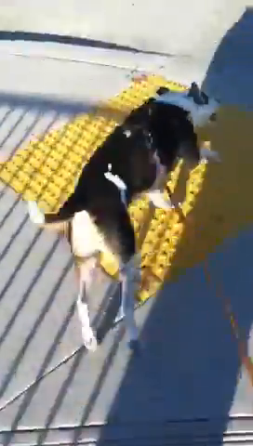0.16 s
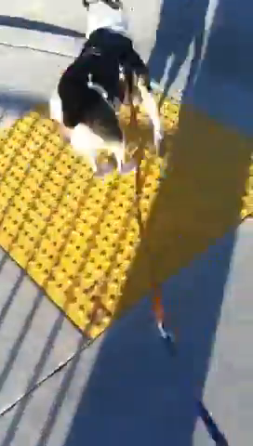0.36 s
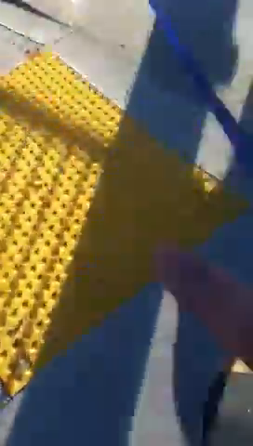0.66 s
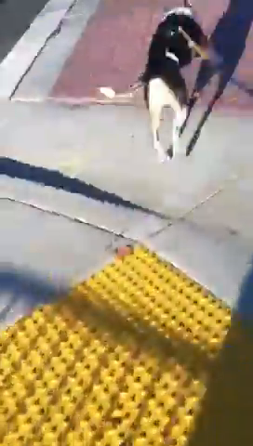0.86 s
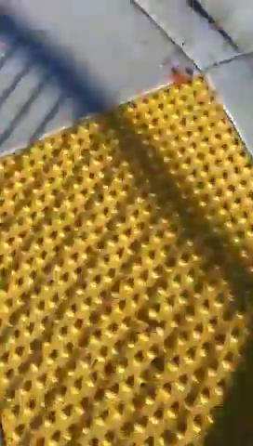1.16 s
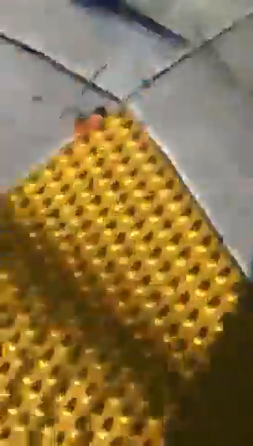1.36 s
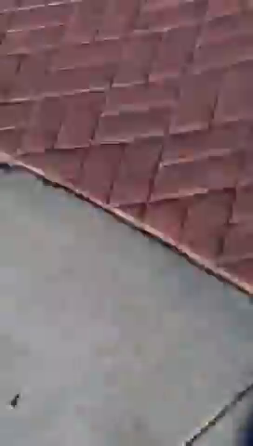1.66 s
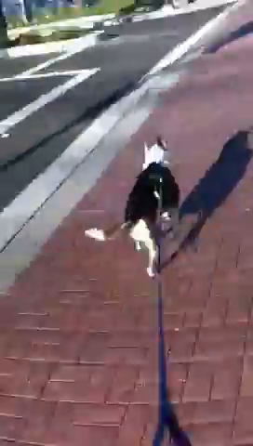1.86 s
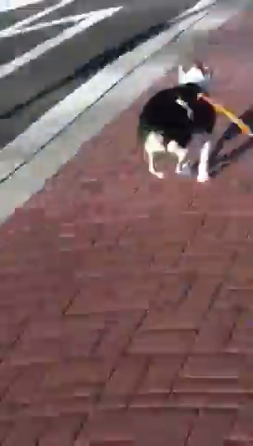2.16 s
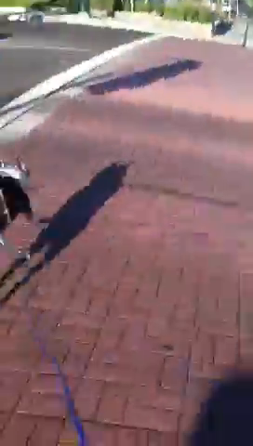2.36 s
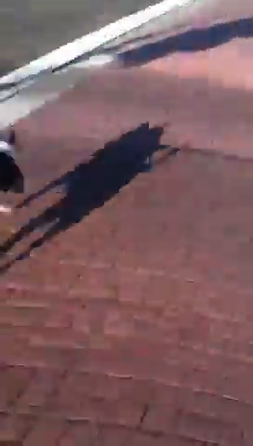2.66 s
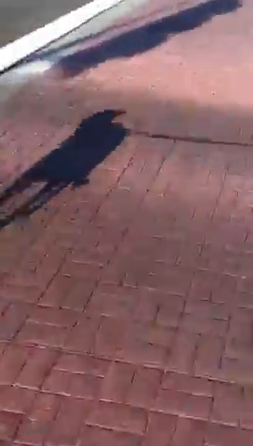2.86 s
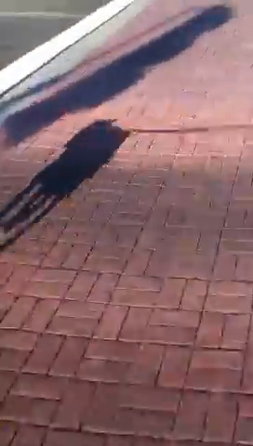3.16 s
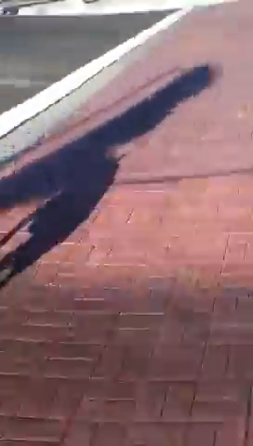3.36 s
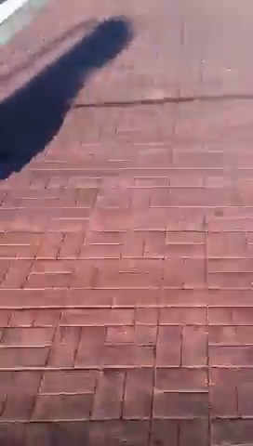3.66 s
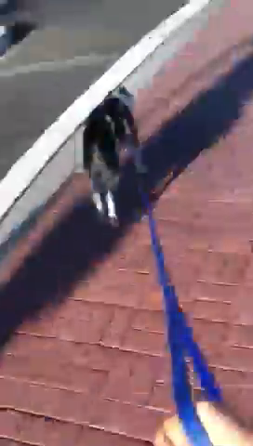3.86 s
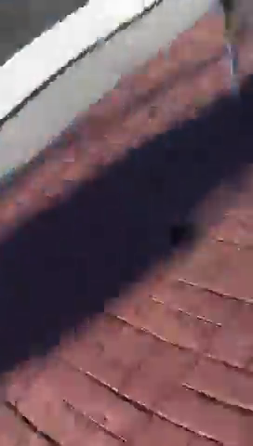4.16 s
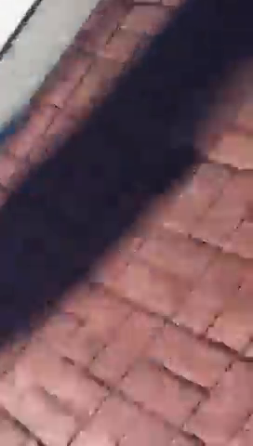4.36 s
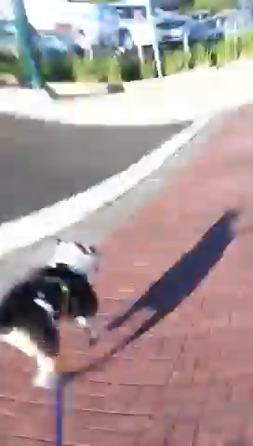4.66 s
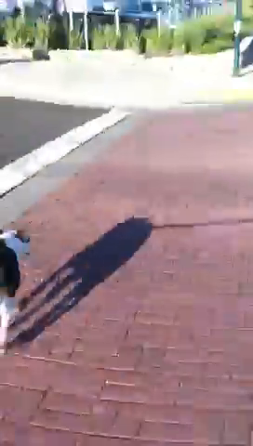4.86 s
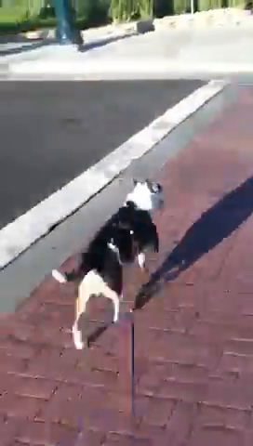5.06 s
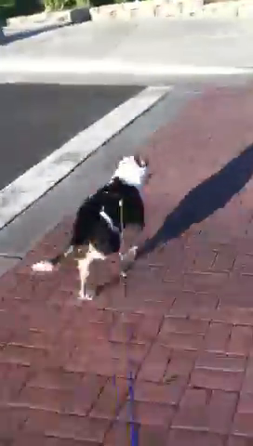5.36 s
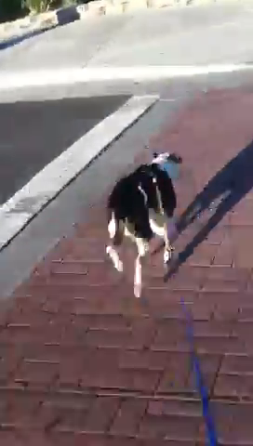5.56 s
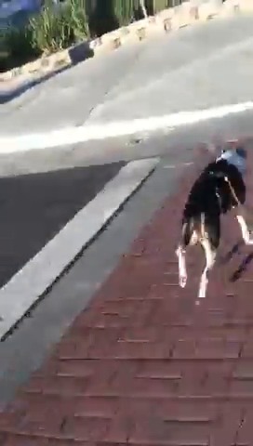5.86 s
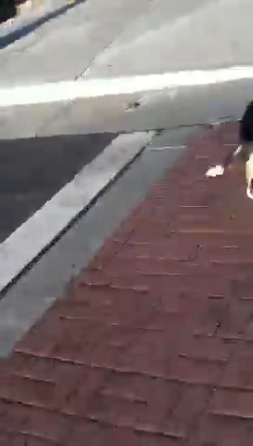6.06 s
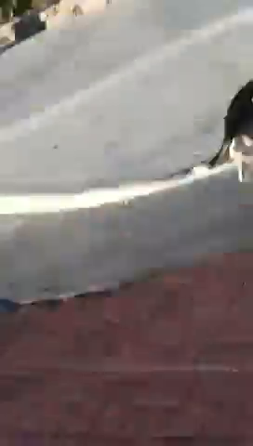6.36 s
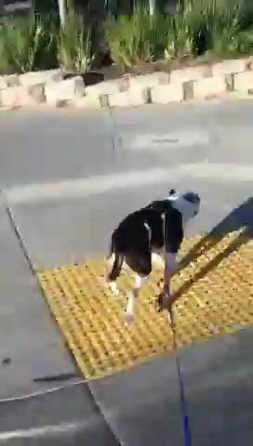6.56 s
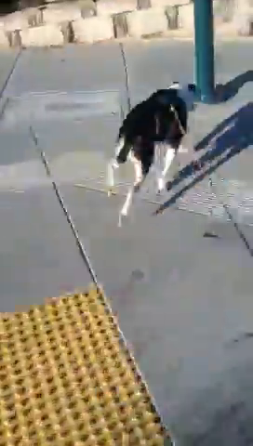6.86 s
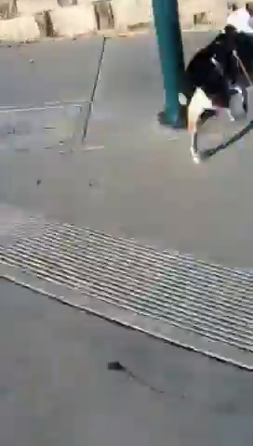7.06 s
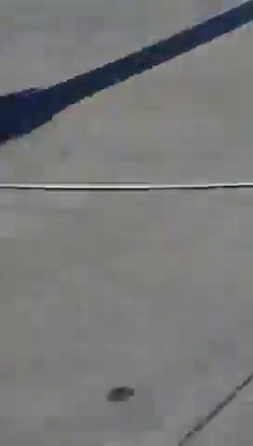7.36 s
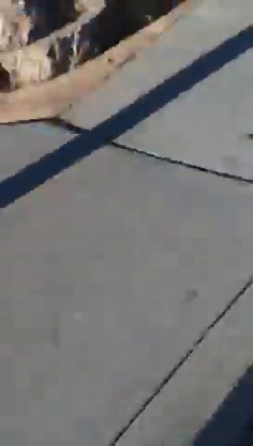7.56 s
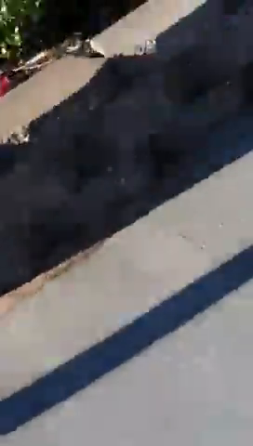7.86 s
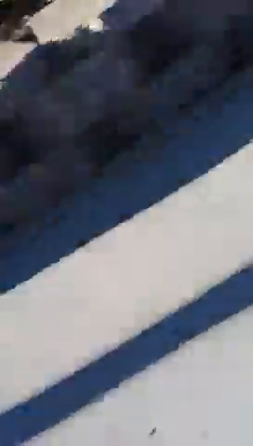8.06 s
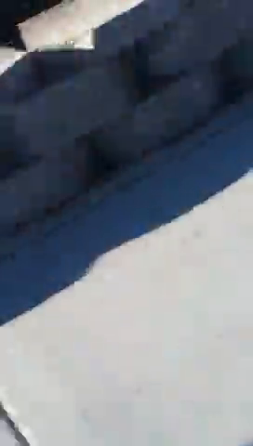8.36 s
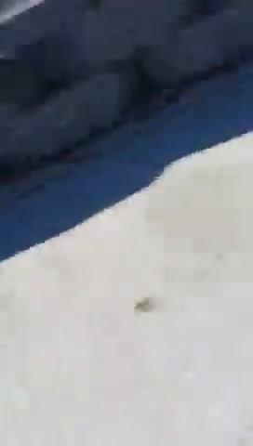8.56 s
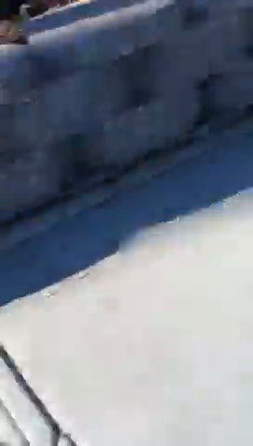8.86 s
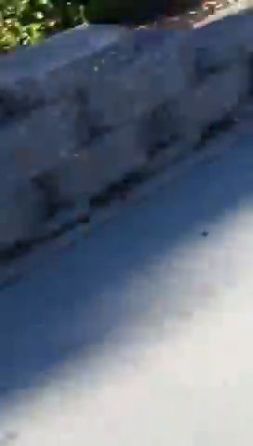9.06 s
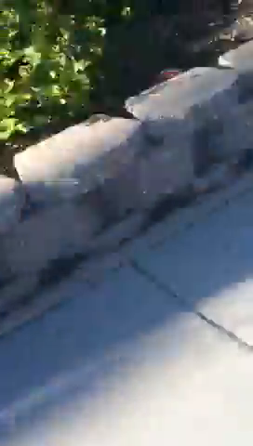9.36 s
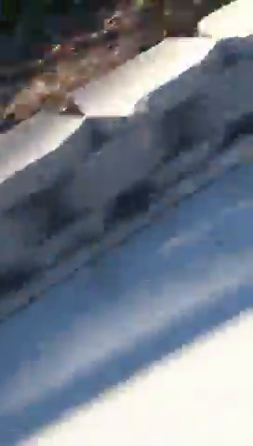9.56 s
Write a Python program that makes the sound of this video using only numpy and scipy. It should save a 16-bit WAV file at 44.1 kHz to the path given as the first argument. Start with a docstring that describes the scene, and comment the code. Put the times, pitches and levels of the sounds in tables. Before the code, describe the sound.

Close, dry outdoor sound over very faint traffic. A soft tap comes at 0.1 s, then small bright leash-clip clinks and scrapes from 0.2 to 0.45 s. At 0.5 s a tiny squeak and a hoarse, falling wheel chirp mark the push-off. A skateboard then scrapes over a studded, hollow-sounding ramp, with knocks and a hard crack at 1.2 s, and more sharp clacks at 1.75 and 1.9 s. From about 2.2 s brick paving makes a loud, surging wooden drone and rasp, crowded with thumps, knocks and rattling parts; a quick even chatter occurs at 4.1 s, and the roar is coarser from 4.7 to 6.7 s. Around 7.2 s it falls to a quiet low rumble with sandy hiss on concrete. Joint clacks in front-then-rear pairs come at 7.4, 7.7, 7.85, 8.45, 8.9, 9.0 and 9.6 s, with a heavy thud at 8.5 s and a crackling loose-cover rattle near 8.9 s.

```python
"""A street with studded kerb ramps, brick paving and smooth concrete: a skateboard rolls behind a leashed dog.
The leash clip clinks as ringing metal modes and the push-off squeaks; then filtered, bump-driven noise
makes the deck drone, rumble, rasp and hiss. Bumps thump the wooden deck and knock the wheels; joints clack.
Small parts clatter, grit ticks as short noise puffs, and shaped noise is the distant traffic.
The close microphone limits the peaks."""
import sys
import numpy as np
from scipy import signal
from scipy.io import wavfile
from scipy.ndimage import uniform_filter1d, minimum_filter1d, map_coordinates

SR = 44100
rng = np.random.default_rng(int(sys.argv[2]) if len(sys.argv) > 2 else 0)


def wav_record(signal):
    """Record a signal, one row per channel, as 16-bit PCM in the file named by sys.argv[1]."""
    frames = np.transpose(np.atleast_2d(signal))
    bounded = np.clip(frames, -1, 1)
    # unit amplitude maps onto the largest positive 16-bit level
    quanta = np.round(bounded * 32767).astype(np.int16)
    wavfile.write(sys.argv[1], SR, quanta)


N = 428652
TIME = np.arange(N) / SR

# wheel rasp spectrum: (nominal frequency [Hz], level [dB])
RASP_SPECTRUM = [(560, -18.5), (800, 5.5), (1100, 5), (1300, -5.5), (1550, -2), (1850, -25), (2200, -21),
                 (2650, -19), (3150, -21.5), (4000, -35.5), (8000, -40.5)]
# grit hiss and metal scrape spectrum: (frequency [Hz], level [dB])
GRIT_SPECTRUM = [(2000, -1), (4000, -0.5), (6000, 2), (9500, -2), (11500, -10), (13500, -22.5),
                 (15500, -40.5)]
# hard-edge contact spectrum: (nominal frequency [Hz], level [dB])
CRACK_SPECTRUM = [(500, 3.5), (1300, 4.5), (2050, 6.5), (2500, -0.5), (3300, -0.5), (4500, -12),
                  (6500, -30), (12000, -47)]
# stretches of ground: (start [s], deck drone before surges [dB],
# then relative to the drone: rumble [dB], rasp [dB], grit hiss [dB])
GROUND_STRETCHES = [(0.473, -31, -7.5, 3, -25.5), (0.55, -24.5, -16.5, -1.5, -33),
                    (0.66, -25.5, -28, -3, -34), (0.879, -33.5, -28, -4, -31), (1.11, -29, -23, 0, -23.5),
                    (1.42, -30.5, -12, -2, -27), (1.971, -33.5, -18, -7.5, -54),
                    (2.06, -30.5, -19.5, -10, -40), (2.26, -20, -17.5, -9.5, -37),
                    (2.55, -21, -14, -5, -47.5), (3.7, -20, -11, -12.5, -40.5), (4.68, -21, -12, -4.5, -50),
                    (6.3, -20.5, -6.5, -6.5, -37.5), (6.67, -19.5, -1, -9, -41),
                    (7.08, -22.5, -3, -10, -43), (7.247, -31.5, -5, -13, -31), (8.08, -33.5, -2, -8, -30.5),
                    (8.54, -31.5, -2, -4, -30), (8.87, -25, -6.5, 2, -42), (9.0, -37, 0, -2, -23),
                    (9.18, -30, -5.5, -7, -28.5)]
# slab joints crossed at a slant: (time [s], front thump [dB], front knock [dB], front ring [Hz],
# second wheel's delay [s], its relative level [dB], rear axle's delay [s], rear thump [dB],
# rear knock [dB], nominal deck pitch [Hz])
JOINTS = [(7.3687, -13.5, -30.5, 1340, 0.0066, 0.5, 0.073, -10, -25, 532),
          (7.656, -17.5, -25, 1670, .007, -6, 0.077, -10, -22.5, 543),
          (7.842, -17, -24.5, 1010, 0.014, -11, 0.077, -12.5, -25, 515),
          (8.45, -15, -29, 1300, 0.013, -0.5, 0.075, -17, -23.5, 512),
          (8.87, -15.5, -19.5, 920, .013, -3.5, .0752, -11, -14.5, 493),
          (8.987, -12, -29, 1650, 0.0043, -6, 0.078, -18, -17.5, 535),
          (9.587, -11, -24.5, 1120, .011, -7, 0.075, -8.5, -18, 553)]


def amp(db):
    """Decibels to gain."""
    return 10 ** (np.asarray(db) / 20)


def evened(x):
    """Scales to unit power."""
    return x / np.sqrt(np.mean(x ** 2) + 1e-20)


def add(mix, s, sound):
    """Mixes a sound in at time s."""
    part = mix[max(round(s * SR), 0):][:len(sound)]
    part += sound[:len(part)]


def smooth(x, size):
    """Triangular running mean."""
    return uniform_filter1d(uniform_filter1d(x, size), size)


def steadied(x, size=3000):
    """Unit power over each short stretch; faster bumps stay."""
    return x / np.sqrt(abs(smooth(x ** 2, size=size)) + 1e-12)


def ring(x, spectrum, size=4096):
    """Passes x through a causal, minimum-phase body that has this spectrum."""
    hz, db = np.transpose(spectrum)
    log_f = np.log(abs(np.fft.fftfreq(size, 1 / SR)) + 1)
    octaves_outside = abs(log_f - np.clip(log_f, np.log(hz[0]), np.log(hz[-1]))) / np.log(2)
    level_db = np.interp(log_f, np.log(hz), db) - 12 * octaves_outside
    log_gain = np.log(amp(level_db))
    response = np.fft.ifft(np.exp(np.conj(signal.hilbert(log_gain)))).real
    return signal.oaconvolve(x, response[:size // 2])[:len(x)]


def bursts(rows, spectrum, fall_s, db):
    """Very short contacts, each a puff that swells quickly and dies in a hard body."""
    out, t = np.zeros(N), TIME[:2000]
    for s, level_db in rows:
        puff = rng.standard_normal(len(t)) * np.sqrt(t / fall_s) * np.exp(-t / fall_s)
        sound = ring(puff, spectrum)
        add(out, s, amp(level_db + db) * sound / abs(sound).max())
    return out


def scatter(start_s, end_s, per_s, db, spread_db, count=900):
    """Irregular contacts of uneven size: rows of (time [s], level [dB])."""
    slip, size = rng.uniform(-1, 1, (count, 2)).T
    at = start_s + (np.arange(count) + 1 + slip) / per_s
    return np.transpose([at, db + spread_db * size])[at < end_s]


def street():
    """Distant traffic: steady noise shaped by a spectrum."""
    # (frequency [Hz], level [dB])
    traffic_spectrum = [(24, -73), (40, -45), (113, -11), (346, -9), (527, -6), (693, -11), (784, -14),
                        (910, -14.5), (15000, -52)]
    level_db = -43
    return amp(level_db) * evened(ring(rng.standard_normal(N), traffic_spectrum))


def taps():
    """Short, dry knocks on the board: noise puffs coloured like the wheel rasp."""
    # (time [s], level [dB])
    tap_rows = [(0.098, -17), (1.498, -6), (7.3005, -6.5), (7.548, -15), (7.553, -17), (7.576, -15.5),
                (7.636, -18), (8.238, -31)]
    return bursts(tap_rows, RASP_SPECTRUM, fall_s=0.0026, db=-10.0)


def clinks():
    """The metal clip scrapes and rings with a new mix of its modes each time."""
    # (time [s], peak [dB])
    clink_rows = [(0.215, -26.5), (0.335, -34), (0.354, -24.5), (0.42, -33), (0.452, -33)]
    # (nominal frequency [Hz], level [dB], t60 [s])
    clip_modes = [(2380, 6, 0.039), (5170, 9.5, 0.027), (6050, 2.5, 0.025), (7200, -8, 0.02),
                  (9100, 1, 0.017), (11100, 3, 0.023)]
    scrape_gain, scrape_s = 3.3, 0.0063
    out, t = np.zeros(N), TIME[:3000]
    for s, peak_db in clink_rows:
        shares, detune = rng.standard_normal(len(clip_modes)), rng.uniform(0.93, 1.04)
        metal = np.zeros(len(t))
        for share, (hz, level_db, t60_s) in zip(shares, clip_modes):
            metal += share * amp(level_db - 60 * t / t60_s) * np.sin(2 * np.pi * hz * detune * t)
        scrape = ring(rng.standard_normal(len(t)) * np.exp(-t / scrape_s), GRIT_SPECTRUM)
        metal = metal + scrape_gain * scrape
        add(out, s, amp(peak_db) * metal / abs(metal).max())
    return out


def squeak(s, width_s, hz, fall_hz_per_s, db, wobble_rad):
    """A brief rubbing squeak: a sine with a wobbling, optionally falling pitch in a bell-shaped swell."""
    t = TIME - s
    wobble = wobble_rad * evened(smooth(rng.standard_normal(N), size=40))
    turns = hz * t - fall_hz_per_s / 2 * t ** 2
    return amp(db) * np.exp(-(t / width_s) ** 2) * np.sin(2 * np.pi * turns + wobble)


def push_off():
    """The leash clip squeaks as it draws tight; a wheel scuffs and lets go with a hoarse chirp."""
    leash = squeak(s=0.465, width_s=0.0031, hz=5200, fall_hz_per_s=0, db=-37, wobble_rad=0.6)
    scuff = bursts([(.493, -26)], CRACK_SPECTRUM, fall_s=0.018, db=-2.0)
    scuff = scuff + squeak(s=.503, width_s=0.012, hz=3410, fall_hz_per_s=0, db=-32, wobble_rad=1.5)
    wheel = squeak(s=.51, width_s=0.0054, hz=1515, fall_hz_per_s=16000, db=-11.5, wobble_rad=0.54)
    return leash + scuff + wheel


def ground(column):
    """One quality of the ground under the wheels, blended where two stretches meet."""
    blend_s = 0.049
    rows = np.asarray(GROUND_STRETCHES)
    stretch = np.maximum(np.searchsorted(rows[:, 0], TIME) - 1, 0)
    return uniform_filter1d(rows[stretch, column], size=int(blend_s * SR))


def effort():
    """Rolling level in dB: set by the ground and by how hard the board runs."""
    # the board runs harder and eases off: (time [s], extra level [dB])
    surge_rows = [(2.2, 6.5), (2.32, 3.5), (2.45, -3), (2.66, 4.5), (2.85, -1), (3.3, -1), (3.55, 2.5),
                  (3.72, 1.5), (4.08, 6.5), (4.22, -1.5), (4.9, 0), (5.5, 2), (6.7, 1), (8.0, -5),
                  (8.25, 2), (8.55, -3.5)]
    surge_s, surge_db = np.transpose(surge_rows)
    return ground(column=1) + np.interp(TIME, surge_s, surge_db)


def bumps(per_s, spread_db, swell_s, size=2000):
    """Contact force: unevenly spaced bumps of uneven size; a round wheel climbs each one smoothly."""
    at = np.cumsum(rng.gamma(2, .5, 4000) / per_s)
    heights = amp(spread_db * np.clip(rng.standard_normal(len(at)), -2, 2))
    train = np.bincount((at * SR).astype(int).clip(0, N), heights, N + 1)[:N]
    u = TIME[:size] / swell_s
    return evened(signal.oaconvolve(train, u * np.exp(-u))[:N])


def wander(x, share, size):
    """The resonances in x slide by about this share of their pitch as the load on the board shifts."""
    lag = evened(smooth(smooth(rng.standard_normal(N), size), size))
    lag = lag * share / np.std(np.diff(lag))
    return map_coordinates(x, [np.arange(N) + lag], order=3, mode="nearest")


def truck(pitch):
    """One axle's bumps ring the deck and rasp in its wheels; at first the ramp panel replaces the rasp."""
    # deck resonances: (nominal frequency [Hz], level [dB])
    deck_spectrum = [(170, -20), (245, -12), (295, 1), (362, -14.5), (440, -3.5), (505, 3), (545, 1),
                     (590, 4), (650, -4.5), (730, -11.5), (1000, -22)]
    # the deck's broader roar on coarse ground: (frequency [Hz], level [dB])
    jolted_spectrum = [(220, -10.5), (375, 1), (640, -13.5)]
    # hollow plastic panel of the first kerb ramp: (frequency [Hz], level [dB])
    panel_spectrum = [(600, -16), (790, 5), (1150, -0.5), (1330, -14), (1900, -18.5), (2170, -14.5),
                      (2500, -26.5), (8000, -44)]
    panel_ends_s, coarse_from_s, coarse_to_s = 1.5, 4.68, 6.7
    even_share, rasp_share = 0.6, 0.29
    on_panel = TIME < panel_ends_s
    coarse = (TIME > coarse_from_s) & (TIME < coarse_to_s)

    studs = bumps(per_s=120, spread_db=4.0, swell_s=0.0022)  # merge into a rough scrape
    force = np.where(on_panel, studs, bumps(per_s=70, spread_db=4.4, swell_s=.002))
    force = force * np.clip(amp(effort() + 27.0), .25, 1)  # quiet, smooth concrete has small bumps
    noise = rng.standard_normal((3, N))

    shaking = (even_share + force) * noise[0]
    deck = wander(ring(shaking, np.multiply(deck_spectrum, [pitch, 1])), share=.01, size=1500)
    roar = ring(force * coarse * noise[2], jolted_spectrum)
    deck = deck + wander(roar, share=0.1027, size=900)

    rubbing = (rasp_share + force) * noise[1]
    wheels = ring(rubbing * ~on_panel, np.multiply(RASP_SPECTRUM, [pitch ** 2, 1]))
    panel = ring(rubbing * on_panel, panel_spectrum)
    rasp = wander(wheels, share=0.0407, size=600) + panel
    return np.array([force, deck, rasp])


def swell(depth_db, size=2200):
    """Patchy ground makes the rolling swell and sink several times a second."""
    return amp(depth_db * np.tanh(evened(smooth(rng.standard_normal(N), size=size))))


def rolling():
    """Two trucks, tuned slightly apart, shake over rough ground while sand hisses in patches."""
    # low rumble: (frequency [Hz], level [dB])
    rumble_spectrum = [(25, -27.5), (60, -28.5), (100, -16), (155, 0), (230, 1.5), (300, -3), (410, -2),
                       (520, -25.5)]
    rumble_db, rasp_db, hiss_db = 2.0, -4.5, 1.5
    hiss_share, force_share, sand_share = 0.39, 0.059, 0.56
    start_s = 0.002
    force, deck, wheels = truck(pitch=0.99) + truck(pitch=1.015)
    sand = bumps(per_s=28, spread_db=5.5, swell_s=0.0022)
    noise = rng.standard_normal((2, N))
    drone = steadied(deck)
    rumble = amp(rumble_db + ground(column=2)) * steadied(ring((1 + force) * noise[0], rumble_spectrum))
    rasp = amp(rasp_db + ground(column=3)) * steadied(wheels)
    fizz = (hiss_share + force_share * force + sand_share * sand) * noise[1]
    hiss = amp(hiss_db + ground(column=4)) * steadied(ring(fizz, GRIT_SPECTRUM), size=6000)
    moving = np.clip((TIME - GROUND_STRETCHES[0][0]) / start_s, 0, 1)
    return moving * amp(effort()) * swell(depth_db=2.5) * (drone + rumble + rasp + hiss)


def blow(sound, db, size=530):
    """Sets the RMS level of a blow over its first 12 ms."""
    return amp(db) * sound / np.sqrt(np.mean(sound[:size] ** 2))


def ping(hz, rattle_rad=0.49, size=3000):
    """The short, hollow ring of a wheel or a truck part, roughened as it rattles on its seat."""
    t60_s, rise_s = 0.027, 0.00098
    overtone, overtone_db = 2.12, -23.5
    t = TIME[:size]
    lag = rng.uniform(0, 2 * np.pi, 2)
    turn = 2 * np.pi * hz * t + rattle_rad * evened(smooth(rng.standard_normal(size), size=50))
    modes = np.sin(turn + lag[0]) + amp(overtone_db) * np.sin(overtone * turn + lag[1])
    return modes * (1 - np.exp(-(t / rise_s) ** 2)) * amp(-60 * t / t60_s)


def clack(thump_db, hz, knock_db, ring_hz, ring_db=-4, dull_db=-3, knock_s=0.0076):
    """A hit snaps the truck, knocks and rings the wheel; the deck swells briefly, rising in pitch, and dies."""
    # wheel knock: (nominal frequency [Hz], level [dB])
    knock_spectrum = [(100, -33.5), (280, 10), (550, -8), (850, 7), (1400, -4), (2100, -26.5), (3500, -42)]
    # truck snap: (nominal frequency [Hz], level [dB])
    snap_spectrum = [(1000, -17), (2100, 9), (3200, -0.5), (5000, -12), (9000, -19.5), (15000, -49.5)]
    rise_s, swell_s, snap_s = 0.00078, 0.0021, 0.0058
    tail_share, tail_s = 0.023, 0.004
    low_hz, low_share = 300, 0.14
    settle, sag, sag_s = 1.0425, 0.18, 0.0029  # deck pitch runs from (settle - sag) to settle times hz
    t = TIME[:3000]
    contact = 1 - np.exp(-(t / rise_s) ** 2)
    after = tail_share * np.exp(-t / tail_s)
    deck_swell = (t / swell_s / 2) ** 2 * np.exp(2 - t / swell_s) + contact * after
    wheel, truck_part, lag = rng.standard_normal((3, len(t)))

    turns = hz * (settle * t + sag * sag_s * np.exp(-t / sag_s))
    low_mode = low_share * np.sin(2 * np.pi * low_hz * t + lag[1])
    deck = deck_swell * (np.sin(2 * np.pi * turns + lag[0]) + low_mode)

    colour = [rng.uniform(0.84, 1.102), 1]  # each edge meets the wheel at another spot
    wheel = ring(wheel * contact * (np.exp(-t / knock_s) + after), np.multiply(knock_spectrum, colour))
    truck_part = ring(truck_part * contact * (np.exp(-t / snap_s) + after), np.multiply(snap_spectrum, colour))
    snap_db = (thump_db + knock_db) / 2 - 20  # grows with both
    struck_wheel = blow(wheel, knock_db + dull_db) + blow(ping(ring_hz), knock_db + ring_db)
    return blow(deck, thump_db) + struck_wheel + blow(truck_part, snap_db)


def thud(db, hz, cycles=0.65):
    """A blunt push that dies within a cycle or two; its slope is taken, so no deep bass remains."""
    turns = hz * TIME[:3000]
    push = np.sin(2 * np.pi * turns) * (turns / cycles) ** 2 * np.exp(2 - 2 * turns / cycles)
    return amp(db) * np.gradient(push, turns) / (2 * np.pi)


def clacks():
    """Hits on studs and edges, dull thuds, and at each slab joint both front wheels, then the rear axle."""
    # a wheel hits a stud or a raised edge:
    # (time [s], deck thump [dB], nominal deck pitch [Hz], wheel knock [dB], wheel ring [Hz])
    bump_rows = [(0.5352, -36, 502, -15, 980), (0.598, -18, 477, -21, 1120), (0.6256, -15, 470, -21, 1080),
                 (0.677, -26, 430, -21.5, 980), (0.759, -22.5, 590, -25, 890), (0.837, -25, 487, -29, 900),
                 (1.1063, -21, 503, -18, 850), (1.115, -19, 517, -21, 910), (1.16, -15, 536, -20, 970),
                 (1.1762, -11, 544, -8, 976), (1.1976, -19, 520, -16, 1810), (1.208, -28, 524, -25, 1430),
                 (1.266, -25, 496, -18.5, 785), (1.304, -18.5, 431, -17, 726), (1.3585, -30, 535, -17, 830),
                 (1.3845, -18.5, 440, -19.5, 1110), (1.5562, -21, 460, -17, 1810),
                 (1.6293, -18.5, 473, -34, 770), (1.6599, -13, 587, -25, 734),
                 (1.8336, -16, 550, -21.5, 780), (1.9303, -5.5, 516, -14, 1270),
                 (1.942, -12, 513, -27, 770), (2.1136, -21.5, 603, -37, 760), (2.3077, -13, 540, -32, 1550),
                 (2.3464, -10, 526, -25.5, 840), (2.6722, -12, 536, -22, 1480), (2.745, -22, 603, -22, 780),
                 (2.801, -16.5, 536, -35, 1140), (2.967, -17.5, 550, -20, 880),
                 (3.013, -17.5, 555, -23, 1190), (3.1155, -13, 570, -35, 940),
                 (3.19, -20, 565, -15.5, 1170), (3.302, -26, 533, -18, 1145), (3.492, -15, 584, -18.5, 900),
                 (3.529, -19, 530, -14, 1040), (3.5398, -12.5, 528, -33, 1100),
                 (3.622, -17.5, 483, -16.5, 750), (3.645, -13, 530, -35, 930),
                 (3.787, -13.5, 505, -31, 1060), (3.873, -12, 487, -22, 1460),
                 (3.927, -15, 540, -16.5, 1050), (4.0084, -11.5, 570, -21, 870),
                 (4.086, -13, 505, -35, 800), (4.4178, -11, 537, -36, 900), (4.608, -11, 560, -32, 1440),
                 (4.6957, -8.5, 615, -15.5, 780), (4.9045, -9, 593, -15, 824),
                 (5.014, -13.5, 517, -28, 1190), (5.098, -15, 498, -30, 1200),
                 (5.153, -19.5, 640, -22, 1100), (5.282, -14, 533, -28, 900),
                 (5.368, -15.5, 560, -22, 1100), (5.453, -20, 730, -17, 720), (5.564, -9, 504, -18, 940),
                 (5.609, -13, 600, -14, 930), (5.622, -12, 567, -22.5, 1450),
                 (5.6673, -13, 576, -24.5, 1160), (5.7036, -11.5, 593, -18.5, 880),
                 (5.868, -24, 544, -21, 1010), (5.977, -17.5, 480, -17.5, 960),
                 (6.0139, -12.5, 526, -20.5, 1670), (6.035, -17.5, 612, -27, 1000),
                 (6.0717, -14.5, 407, -21, 1240), (6.1156, -6.5, 470, -15.5, 1110),
                 (6.188, -14, 515, -17.5, 1020), (6.333, -16, 518, -21, 890), (6.5588, -12, 580, -31, 1100),
                 (6.5951, -10, 606, -22, 960), (6.688, -22.5, 425, -18.5, 900),
                 (6.735, -16, 380, -18, 1030), (6.756, -26, 475, -13, 836), (6.818, -16, 527, -21, 1050),
                 (6.9223, -12.5, 543, -19, 1060), (6.945, -30, 434, -13.5, 840),
                 (6.986, -10.5, 495, -22, 1270), (7.0738, -8, 580, -26.5, 1050),
                 (7.168, -20, 555, -21, 794), (7.186, -22, 510, -37, 775), (7.197, -13.5, 594, -45, 870),
                 (7.634, -26, 566, -35, 900), (9.1635, -24, 467, -26.5, 747), (9.2555, -22, 604, -28, 930)]
    # the rider's weight drops through the deck, or a wheel off an edge: (time [s], level [dB], pitch [Hz])
    thud_rows = [(1.497, -17, 161), (4.696, -18, 202), (7.3003, -7, 750), (7.3015, -15, 200),
                 (7.920, -23, 264), (8.528, -4, 278), (8.682, -18.5, 200), (9.064, -11, 273)]
    rear_pitch_ratio, rear_ring_hz = 1.077, 1428
    push_db, push_hz = -10, 220  # push level is relative to the thump
    out = np.zeros(N)
    for s, *hit in bump_rows:
        add(out, s, clack(*hit))
    for s, *drop in thud_rows:
        add(out, s, thud(*drop))
    for s, thump_db, knock_db, ring_hz, delay_s, softer_db, gap_s, rear_thump_db, rear_knock_db, hz in JOINTS:
        hits = [(s, thump_db, hz, knock_db, ring_hz),
                (s + delay_s, thump_db + softer_db, hz, knock_db + softer_db, ring_hz),
                (s + gap_s, rear_thump_db, hz * rear_pitch_ratio, rear_knock_db, rear_ring_hz)]
        for at, db, *timbre in hits:
            hit = clack(db, *timbre, ring_db=-5, dull_db=0, knock_s=0.0095)
            add(out, at, hit + thud(db + push_db, push_hz))
    return out


def grating():
    """Grit on the ramp panel, later a loose utility cover: scattered puffs in a hard, lower-tuned body."""
    panel_grit = scatter(start_s=.56, end_s=1.7, per_s=40, db=-30, spread_db=3)
    loose_cover = scatter(start_s=8.88, end_s=8.976, per_s=260, db=-25, spread_db=8)
    body = np.multiply(CRACK_SPECTRUM, [.85, 1])
    return bursts([*loose_cover, *panel_grit], body, fall_s=0.0026, db=-4.0)


def cracks():
    """Hard edges strike together: a truck on a ramp lip, a loose cover in its frame."""
    # (time [s], level [dB])
    crack_rows = [(1.193, -7), (1.199, 1), (1.359, -12.5), (1.556, -19), (1.562, -18), (1.746, -5.5),
                  (1.919, -4.5), (1.924, -12), (1.933, -5), (2.115, -23.5), (4.365, -21), (4.471, -24),
                  (6.247, -17), (6.889, -15.5), (8.6815, -16.5), (8.8875, -14), (8.9195, -9.5),
                  (8.934, -17), (8.941, -12), (8.947, -10), (8.9595, -19), (8.9725, -26), (8.9855, -6),
                  (8.993, -6), (9.638, -25)]
    return bursts(crack_rows, CRACK_SPECTRUM, fall_s=.0022, db=-2.0)


def clatter():
    """Washers, bearings and wheels are shaken on rough ground: many short rings, scattered in pitch."""
    low_hz, top_hz, db_per_octave = 716, 3360, -10
    out, level_db = np.zeros(N), effort() + ground(column=3)
    hits = scatter(start_s=2.5, end_s=7.2, per_s=90, db=-4.0, spread_db=6.0)
    for (s, db), part in zip(hits, rng.random(len(hits))):
        octaves = part * np.log2(top_hz / low_hz)
        sound = ping(low_hz * 2 ** octaves, rattle_rad=0.3 * 2 ** octaves)
        add(out, s, blow(sound, level_db[int(s * SR)] + db + db_per_octave * octaves))
    return out


def brick_joints():
    """Lesser joints between bricks knock at random, each at its own pitch, as hard as the board runs."""
    deck_hz, detune = 520, 0.23
    knock_db, knock_spread_db = -4, 6  # relative to the thump
    ring_hz, ring_octaves = 1050, 0.518
    out, level_db = np.zeros(N), effort()
    hits = scatter(start_s=2.55, end_s=7.0, per_s=32, db=-6.0, spread_db=3.0)
    for (s, db), (pitch, hardness, spot) in zip(hits, rng.uniform(-0.96, 1, (len(hits), 3))):
        thump_db = level_db[int(s * SR)] + db
        knock = thump_db + knock_db + knock_spread_db * hardness
        add(out, s, clack(thump_db, deck_hz * (1 + detune * pitch), knock, ring_hz * 2 ** (ring_octaves * spot)))
    return out


def sand_cracks():
    """Sand cracks under the wheels: loud grains, sidewalk sand, and joint sand crushed by each axle."""
    # loud grains: (time [s], level [dB])
    grain_rows = [(2.82, -30), (3.3873, -27), (6.6335, -29)]
    # (frequency [Hz], level [dB])
    sand_spectrum = [(3000, -9), (7000, -2), (11000, -4.5), (15500, -31)]
    sidewalk = scatter(start_s=8.2, end_s=9.7, per_s=19, db=-34.5, spread_db=6)
    joints = [(s + late_s, -30) for s, *_, gap_s, _, _, _ in JOINTS for late_s in (0, gap_s)]
    return bursts([*grain_rows, *sidewalk, *joints], sand_spectrum, fall_s=0.003, db=-9.5)


def chatter():
    """The board bounces evenly over a row of bricks: five equally spaced clacks."""
    start_s, period_s = 4.102, .0205
    out = np.zeros(N)
    for k in range(5):
        add(out, start_s + k * period_s, clack(thump_db=-9, hz=580, knock_db=-27, ring_hz=1000))
    return out


def outdoors(x):
    """Faint scatter from the rider, kerbs and walls: a decaying noise tail."""
    wet_db, t60_s, gap_s, size = -21, 0.053, .006, 12000
    t = TIME[:size]
    tail = rng.standard_normal(size) * amp(-60 * t / t60_s) * (t > gap_s)
    return x + amp(wet_db) * signal.oaconvolve(x, tail / np.linalg.norm(tail))[:N]


def scene():
    """The board and the leash close by, the street behind."""
    leash = clinks() + push_off()
    board = rolling() + clacks() + chatter() + brick_joints() + clatter()
    contacts = taps() + grating() + cracks() + sand_cracks()
    return (outdoors(leash + board + contacts) + street())[None]


def record(dry):
    """A fast limiter holds the peaks; then a steep low-pass limits the band."""
    ceiling, edge_hz = .7, 15300
    gain = minimum_filter1d(ceiling / np.maximum(abs(dry[0]), ceiling), size=120)
    limited = dry * smooth(gain, size=60)
    low_pass = signal.firwin(511, edge_hz, window=("kaiser", 9), fs=SR)
    return signal.oaconvolve(limited, low_pass[None], "same")


dry = scene()
out = record(dry)
wav_record(out)
```